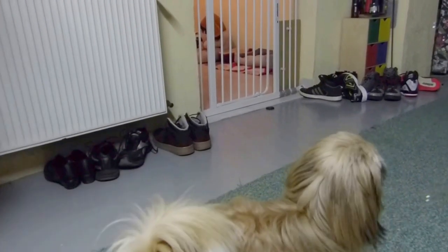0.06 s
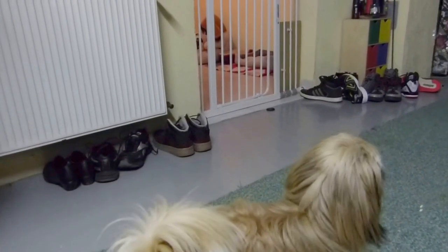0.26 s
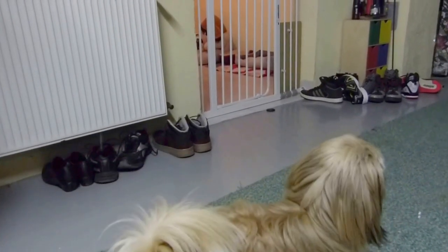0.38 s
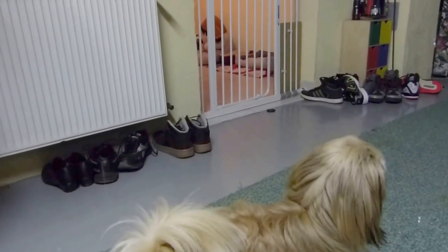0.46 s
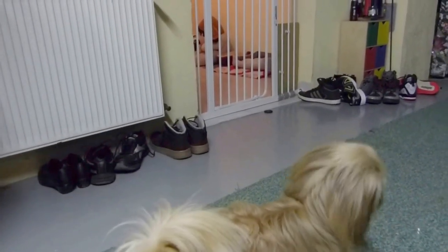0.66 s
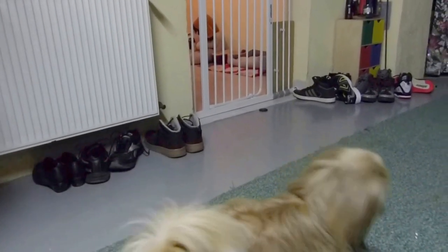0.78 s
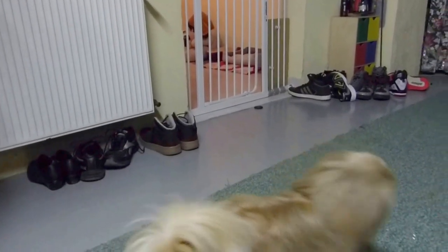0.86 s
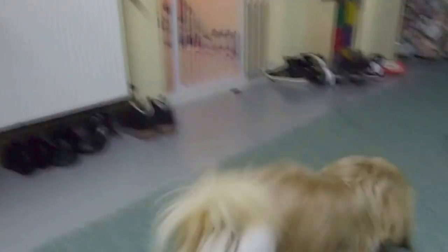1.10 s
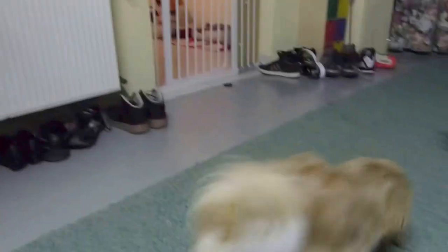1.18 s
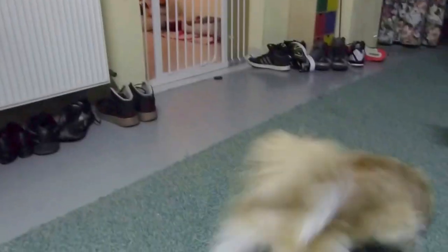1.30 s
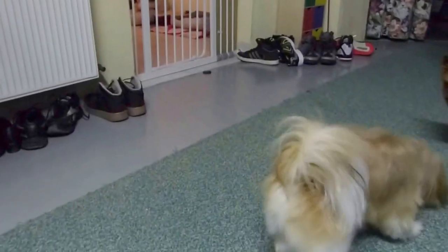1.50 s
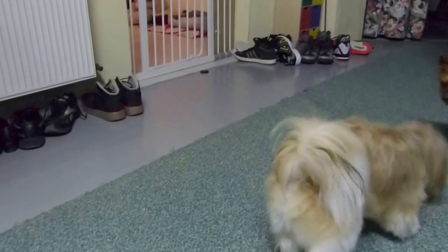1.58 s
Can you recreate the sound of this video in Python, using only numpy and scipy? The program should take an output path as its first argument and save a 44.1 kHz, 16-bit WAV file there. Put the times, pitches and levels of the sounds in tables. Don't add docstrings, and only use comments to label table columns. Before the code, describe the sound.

A small dog snaps its jaws once, sharp and hard, then ticks and paw scuffs on carpet

```python
import sys
import numpy as np
from scipy import signal
from scipy.fft import rfft, irfft
from scipy.io import wavfile
from scipy.ndimage import uniform_filter1d

SR = 44100
rng = np.random.default_rng(int(sys.argv[2]) if len(sys.argv) > 2 else 0)


def put_to_file(sound):
    columns = np.atleast_2d(sound).T
    safe = np.clip(columns, -1, 1)
    whole_steps = np.round(safe * 32767)
    wavfile.write(sys.argv[1], SR, whole_steps.astype(np.int16))


def gain_from_db(level_db):
    decades = np.asarray(level_db, float) / 20
    return 10 ** decades


N = 72765


def evened(x):
    return x / np.sqrt(np.mean(x ** 2) + 1e-20)


def read(points, hz):
    f, value = np.transpose(points)
    return np.interp(np.log(hz + 1), np.log(f + 1), value)


def curve(points):
    s, db = np.transpose(points)
    return gain_from_db(np.interp(np.arange(N) / SR, s, db, left=-120))


def add(mix, s, sound):
    part = mix[..., round(s * SR):][..., :sound.shape[-1]]
    part += sound[..., :part.shape[-1]]


def sides(x, left_db):
    return x * gain_from_db([[left_db / 2], [-left_db / 2]])


def resonate(x, hz, width):
    return signal.lfilter(*signal.iirpeak(hz, hz / width, SR), x)


def ring(modes):
    onset_s = 0.00018
    t = np.arange(2400) / SR
    x = np.zeros(len(t))
    for k, (hz, width, db) in enumerate(modes):
        decay = np.exp(-np.pi * width * t)
        x += (-1) ** k * gain_from_db(db) * np.sin(2 * np.pi * hz * t) * decay
    x = x * (1 - np.exp(-t / onset_s))
    return x / abs(x).max()


def burst(length_s, noise):
    x = noise * np.exp(-np.arange(noise.shape[-1]) / SR / length_s)
    return x / np.linalg.norm(x, axis=-1, keepdims=True)


def hiss(spectrum, patchy_db):
    frames = N // 128 + 5
    a, b, patches = rng.standard_normal((frames, 257, 3)).T
    patches = uniform_filter1d(patches, size=6, axis=0)
    patches = evened(uniform_filter1d(patches, size=12, axis=1))
    cells = (a + 1j * b) * gain_from_db(patchy_db * patches)
    flat = signal.istft(cells, nperseg=512, noverlap=384)[1][:N]
    gain = gain_from_db(read(spectrum, np.fft.rfftfreq(N, 1 / SR)))
    return evened(irfft(rfft(flat) * gain, N))


# (f/Hz, level/dB per Hz)
AIR_SHARED = [(20, -7.5), (100, -9.5), (300, -4.5), (1000, -9.5), (2500, -16), (10000, -20.5), (13000, -25),
              (16500, -40)]
# (f/Hz, level/dB per Hz)
AIR_WIDE = [(12, -59), (20, -34), (289, -5.5), (492, -4.5), (652, -0.5), (913, -8.5), (1050, -12.5),
            (10500, -31.5), (16500, -39)]


def air():
    mid = gain_from_db(-63) * hiss(AIR_SHARED, patchy_db=0.4)
    side = gain_from_db(-59.5) * hiss(AIR_WIDE, patchy_db=0.4)
    waver = uniform_filter1d(rng.standard_normal((2, N)), size=3000)
    waver = evened(uniform_filter1d(waver, size=3000))
    hum_hz = 148.5 + 1.2 * waver[0]
    hum_db = -64.5 + 0.9 * waver[1]
    lead = 0.236
    turn = 2 * np.pi * np.cumsum(hum_hz) / SR
    hum = gain_from_db(hum_db) * sides(np.sin([turn + lead, turn - lead]), left_db=2)
    return np.array([mid + side, mid - side]) + hum


# (f/Hz, fade/s)
ROOM_FADE = [(400, 0.4), (1000, 0.25), (1700, 0.3), (3000, 0.35), (6000, 0.17), (10000, 0.2), (16000, 0.25)]
# (f/Hz, level/dB)
WALL_COLOUR = [(300, 10), (900, 7), (1650, -1.5), (2300, 5.5), (3000, -12), (3800, -4), (4700, 8),
               (9000, 0.5)]
# (t/s, level/dB)
BOUNCES = [
    (.0042, -14),
    (.0075, -22),
    (.012, -21),
    (.0167, -21),
    (.022, -24),
]


def room(x):
    length, same = SR // 2, 0.66
    taps = np.zeros((2, length))
    at = np.arange(40, length - 20, 20) + rng.integers(0, 20, (2, (length - 41) // 20))
    np.put_along_axis(taps, at, rng.choice([-1., 1.], at.shape), 1)
    taps[1] = same * taps[0] + np.sqrt(1 - same ** 2) * taps[1]
    hz, t, z = signal.stft(taps, SR, nperseg=256)
    fade_db = read(WALL_COLOUR, hz)[:, None] - 60 * t / read(ROOM_FADE, hz)[:, None]
    tail = signal.istft(z * gain_from_db(fade_db), SR, nperseg=256)[1]
    tail = gain_from_db(-6) * tail / np.linalg.norm(tail[0])
    soften = signal.butter(2, 4500, fs=SR)
    for s, db in BOUNCES:
        rough = rng.standard_normal(150) + 0.31 * rng.standard_normal((2, 150))
        echo = burst(0.000147, rough)
        add(tail, s, gain_from_db(db + 4.5) * signal.lfilter(*soften, echo))
    return signal.fftconvolve(x.mean(0)[None], tail, axes=1)[:, :N]


# (t/s, level/dB at peak, f/Hz, level/dB of the left-right opposite part)
THUDS = [(.02, -91, 800, -55), (.1, -60.5, 1030, -54), (.32, -69, 510, -53), (.665, -58.5, 523, -48),
         (.76, -60.5, 966, -45), (.864, -63, 513, -50), (.9, -60, 482, -49), (.993, -57, 575, -58),
         (1.1, -59.5, 815, -43), (1.182, -59, 880, -49), (1.273, -48, 1356, -63), (1.268, -51, 1066, -69),
         (1.326, -56, 960, -56), (1.399, -47, 404, -63), (1.4, -55, 265, -63), (1.402, -48, 1048, -62),
         (1.408, -54, 670, -53), (1.397, -46, 911, -59), (1.441, -51.5, 437, -59),
         (1.44, -46.5, 672, -65.5), (1.455, -52.5, 700, -60), (1.478, -59, 785, -58),
         (1.497, -49.5, 829, -46), (1.561, -58.5, 895, -60), (1.585, -57.5, 854, -54),
         (1.612, -55, 853, -55)]


def knocks():
    rise_s, t60, width = 0.0046, 0.074, 100
    wide_hz, wide_width = 623, 72
    glide, puff_share = 0.8, 1.1
    out, t = np.zeros((2, N)), np.arange(5000) / SR
    noise = rng.standard_normal((len(THUDS), 2, 5000))
    shape = gain_from_db(-60 * t / t60) * (1 - np.exp(-t / rise_s))
    for (s, db, hz, wide_db), (a, b) in zip(THUDS, noise):
        puff = resonate(resonate(a * shape, hz, width), hz, width * 2)
        tone = shape * np.sin(2 * np.pi * hz * t * (1 + glide * t))
        mid = puff_share * puff / abs(puff).max() + tone / abs(tone).max()
        side = resonate(resonate(b * shape, wide_hz, wide_width), wide_hz, wide_width * 2)
        mid = gain_from_db(db) * mid / abs(mid).max()
        side = gain_from_db(wide_db) * side / abs(side).max()
        add(out, s, np.array([mid + side, mid - side]))
    return out


# (t/s, level/dB)
PAW_PRESSURE = [(1.18, -78), (1.24, -56.5), (1.262, -55), (1.275, -47), (1.288, -45.5), (1.312, -54),
                (1.33, -55.5), (1.352, -47), (1.374, -52), (1.397, -41), (1.41, -43.5), (1.435, -51),
                (1.47, -55.5), (1.52, -59.5), (1.65, -59)]
# (f/Hz, level/dB per Hz)
FIBRE_COLOUR = [(150, -22), (500, -15.5), (1000, -4), (1800, -7), (2500, -8.5), (6000, -4.5), (11000, -8),
                (16000, -32)]
# (f/Hz, width/Hz, level/dB)
FIBRE_RINGS = [(2420, 500, -10.5), (4000, 190, -10), (4760, 180, -9), (7800, 180, -21)]
# (t/s, level/dB)
WEIGHT_SHIFT = [
    (1.0, -86),
    (1.022, -66.5),
    (1.204, -55),
    (1.236, -70),
    (1.28, -56),
    (1.294, -57),
    (1.388, -53.5),
    (1.402, -51),
    (1.65, -62.5),
]


def scuffs():
    grains = uniform_filter1d(rng.exponential(1, N) ** 2, size=30)
    grains = 1 + 0.15 * evened(grains - 2)
    mid, side = (hiss(FIBRE_COLOUR, patchy_db=-1.0) * grains for _ in range(2))
    mid = mid + sum(gain_from_db(db + 6.5) * resonate(mid, hz, width) for hz, width, db in FIBRE_RINGS)
    no_rumble = signal.butter(2, 350, "high", fs=SR)
    mid, side = signal.lfilter(*no_rumble, [mid, gain_from_db(-8.5) * side])
    rub = curve(PAW_PRESSURE) * np.array([mid + side, mid - side])
    low = [evened(resonate(resonate(rng.standard_normal(N), 1100, 380), 620, 600)) for _ in range(2)]
    shuffle = curve(WEIGHT_SHIFT) * np.array(low)
    return gain_from_db(-3.5) * (rub + shuffle)


# (t/s, length/s, f/Hz, level/dB)
WHISTLES = [(1.268, .04, 4800, -55), (1.445, .015, 7700, -60), (.755, .032, 2150, -68),
            (.833, .01, 3080, -65), (.858, .016, 3080, -66), (1.125, .012, 8300, -67),
            (.4, .025, 4950, -63), (.405, .04, 7250, -62), (.91, .02, 6500, -69), (.472, .03, 2900, -67),
            (1.27, .03, 2300, -61), (1.385, .03, 2500, -58)]


def squeaks():
    width = 150
    out = np.zeros(N)
    for s, length_s, hz, db in WHISTLES:
        noise = rng.standard_normal(3000)
        x = evened(resonate(resonate(noise, hz, width), hz, 2 * width))
        x = x[500:][:round(length_s * SR)]
        add(out, s, gain_from_db(db) * x * np.sqrt(np.hanning(len(x))))
    return out


# (f/Hz, level/dB)
CLICK_COLOUR = [(100, -33), (330, -22), (420, 0), (10500, 0), (12500, -6), (16500, 2)]


def coloured(x):
    return irfft(rfft(x) * gain_from_db(read(CLICK_COLOUR, np.fft.rfftfreq(N, 1 / SR))), N)


# (t/s, level/dB at peak, own f/Hz, own level/dB over the shared body, left over right level/dB)
SMALL_TICKS = [(0.3166, -36, 7200, 2, 4), (0.3253, -30, 7000, -29, 9), (.326, -31.5, 4160, 0, 7),
               (0.3343, -30, 6900, -14, 3), (0.348, -44, 9600, -10, 12), (0.357, -37.5, 7300, -22, 11),
               (0.3904, -39, 6900, 2, 5), (0.3959, -31, 7100, -29, 8.5), (.408, -43, 7200, -18, 7),
               (0.4699, -26, 11640, -13, 6), (0.4701, -45, 2900, 18, 13), (0.4744, -36, 9400, -6, 4),
               (0.4805, -49, 4650, 12, 1), (.4865, -48.5, 2670, 9, 6), (.4975, -52, 2900, 16, 3),
               (0.5174, -50.5, 2670, 19, 5), (0.5387, -53, 2680, 14, 5), (.071, -53.5, 2500, 12, 7),
               (0.33, -45, 9200, 0, 5), (0.341, -36, 4000, 8, 4), (0.366, -40, 7100, 0, 3),
               (.7475, -54, 2670, 14, 3), (0.591, -46.5, 4400, -10, 7), (0.7473, -41.5, 7230, 5, 4),
               (.8048, -54, 7840, 2, 0), (0.906, -48, 6900, -9, 3), (0.9999, -48, 5200, 0, 5),
               (1.4815, -44, 6000, -24, -26)]
# (f/Hz, width/Hz, level/dB)
TICK_BODY = [(4080, 330, -6), (5200, 500, 1.5), (7180, 1400, 15), (9230, 550, 2), (10720, 390, -6)]
# (f/Hz, width/Hz, level/dB)
COLLAR_TAG = [(4930, 85, -21), (7300, 100, -25), (2900, 41, -20)]


def ticks():
    out, noise = np.zeros((2, N)), rng.standard_normal((len(SMALL_TICKS), 200))
    body = ring(TICK_BODY + COLLAR_TAG)
    for (s, db, hz, own_db, left_db), puff in zip(SMALL_TICKS, noise):
        own = gain_from_db(own_db) * ring([(hz, 570, 0)])
        scrape = burst(0.00012, puff)
        tick = np.convolve(body + own, scrape)
        add(out, s, sides(gain_from_db(db) * tick / abs(tick).max(), left_db))
    return coloured(out)


SNAP_S = 0.2473

# (f/Hz, level/dB, time to fade by 60 dB/s)
METAL = [(1190, -10, .15), (1507, -5, .2), (1575, -6, .21), (1650, 0, .21), (1752, -1, .22),
         (2557, -13, .25), (2993, -11, .2), (3138, -15, .29), (3381, -14, .26), (3763, -11, .3),
         (3990, -6, .24), (4430, -15, .2), (4893, -16, .2)]


def bars():
    out, t = np.zeros((2, N)), np.arange(SR // 3) / SR
    rise = 1 - np.exp(-t / 0.0019)
    for (hz, db, t60), (phase, lead) in zip(METAL, rng.random((len(METAL), 2))):
        wave = np.sin(2 * np.pi * (hz * t + phase) + np.array([[0.4], [-0.4]]) * lead)
        add(out, SNAP_S, gain_from_db(-33.5 + db - 60 * t / t60) * rise * wave)
    return out


# (f/Hz, width/Hz, level/dB)
TEETH_RINGS = [(5270, 560, -6), (6900, 1020, 0), (8270, 860, -8.5), (9400, 690, -4), (11400, 2100, -1),
               (14000, 5800, -8)]
# (f/Hz, width/Hz, level/dB)
MOUTH_RINGS = [(533, 220, -34), (1156, 150, -11.5), (1384, 250, -2.5), (1695, 320, 2.5), (2873, 350, 3.5),
               (3735, 384, 6.5)]


def jaws():
    out = np.zeros((2, N))
    crack = gain_from_db(-9) * ring(TEETH_RINGS)
    pop = gain_from_db(-6.5) * ring(MOUTH_RINGS)
    add(out, SNAP_S, sides(crack, left_db=7))
    add(out, SNAP_S + 0.0005, sides(pop, left_db=6.5))
    return coloured(out)


def scene():
    snap, small, paws = jaws(), ticks(), scuffs()
    early = np.arange(N) < 0.7 * SR
    small_wet = gain_from_db(np.where(early, 2.5, -6))
    wet = room(snap + small_wet * small + gain_from_db(-6) * paws)
    return air() + wet + knocks() + paws + squeaks() + small + bars() + snap


def top_cut(x):
    return signal.sosfilt(signal.butter(12, 16430, fs=SR, output="sos"), x)


def record(dry):
    edge = signal.firwin(511, 16500, window=("kaiser", 9), fs=SR)[None]
    mix = signal.oaconvolve(dry, edge, "same")
    return top_cut(mix)


dry = scene()
out = record(dry)
put_to_file(out)
```